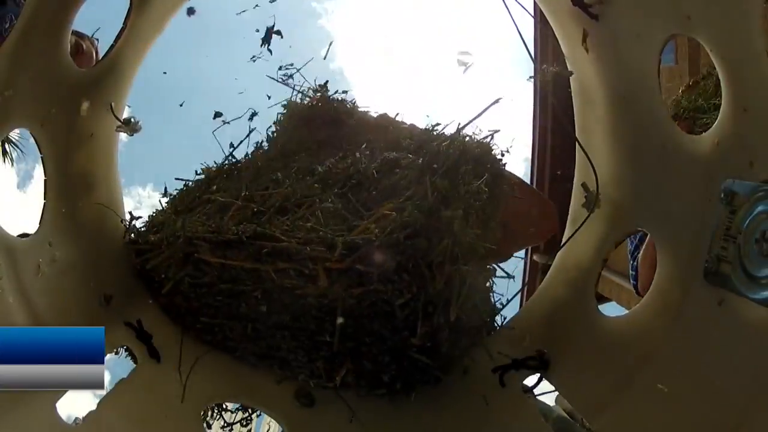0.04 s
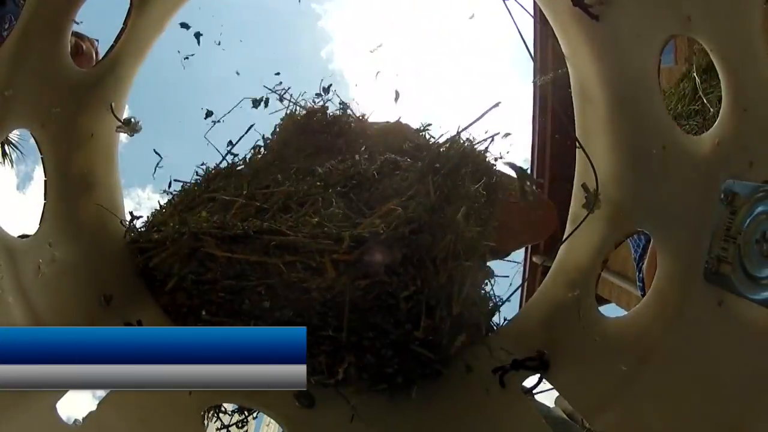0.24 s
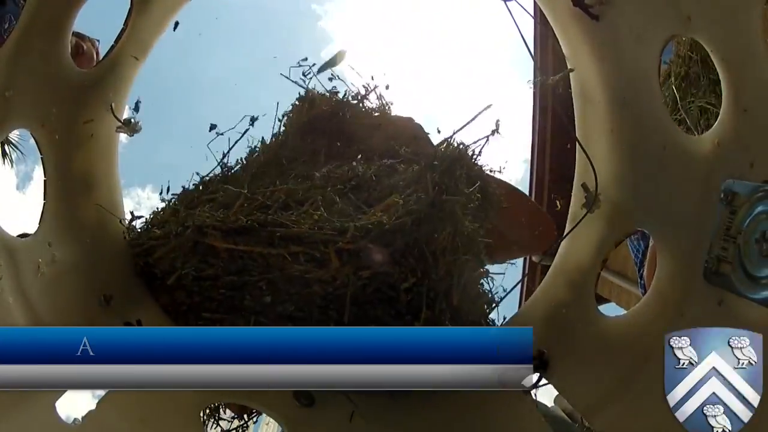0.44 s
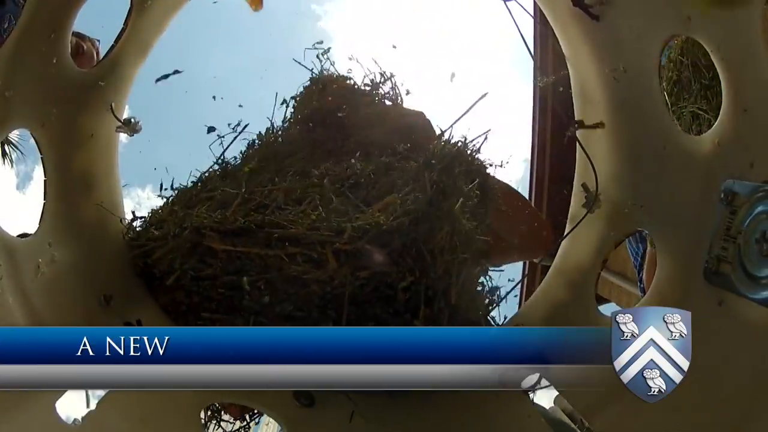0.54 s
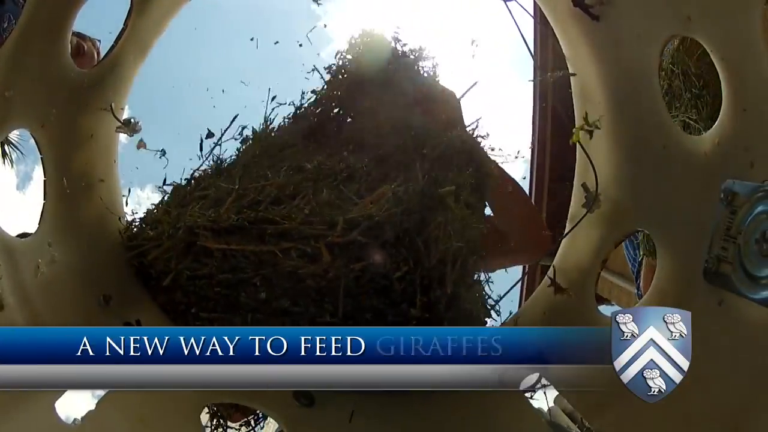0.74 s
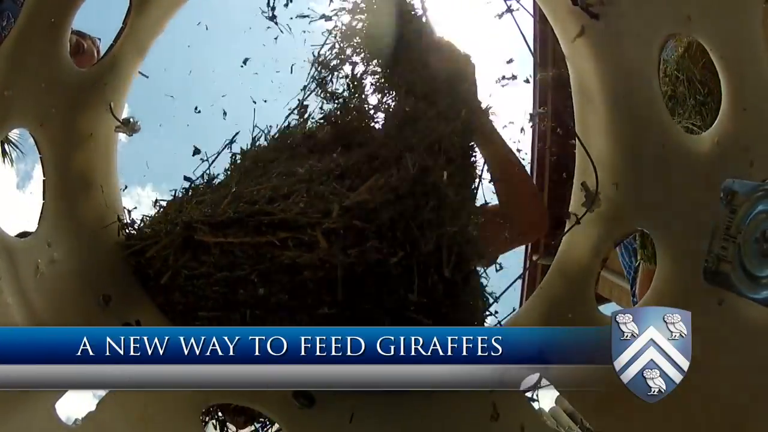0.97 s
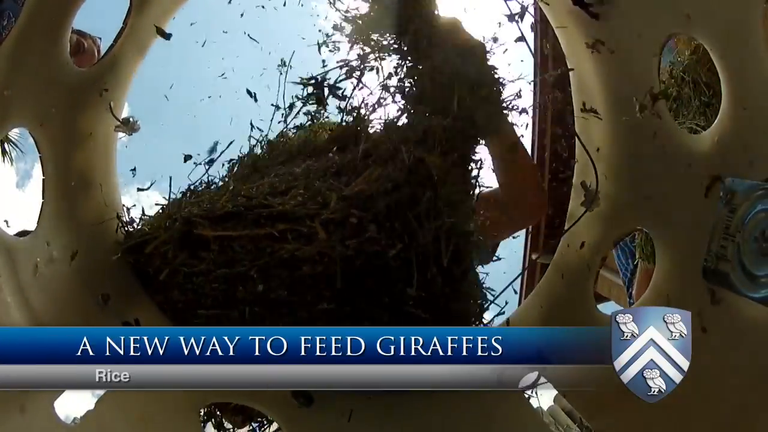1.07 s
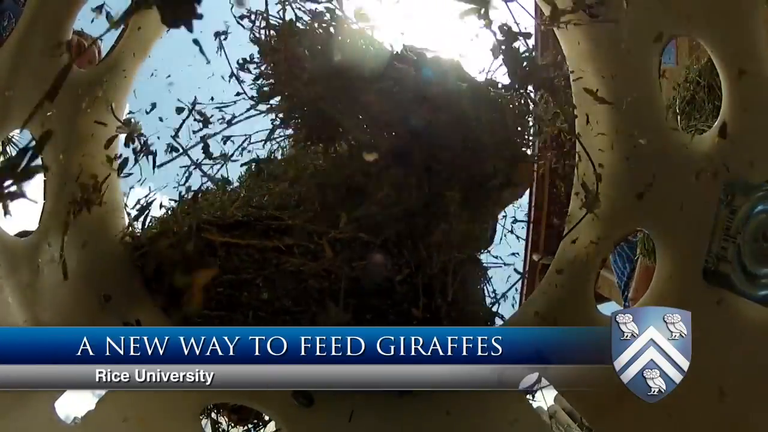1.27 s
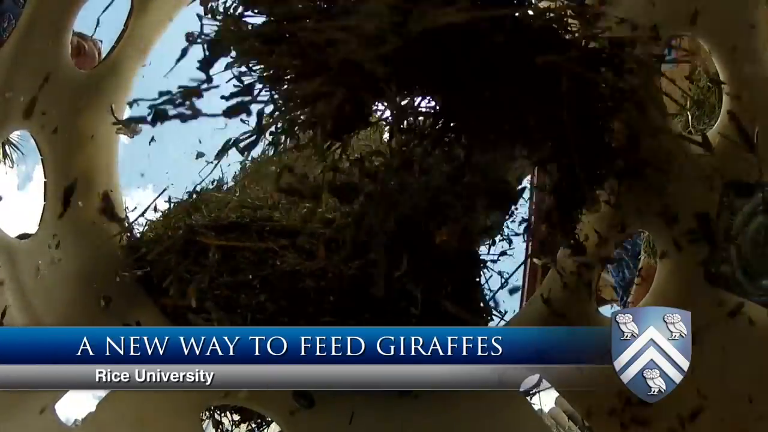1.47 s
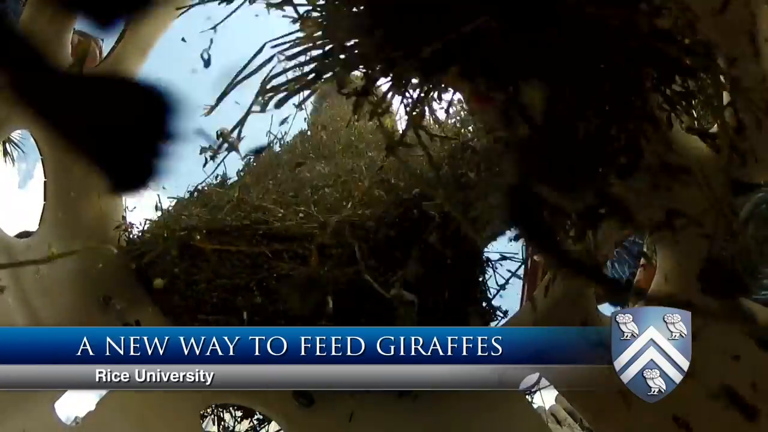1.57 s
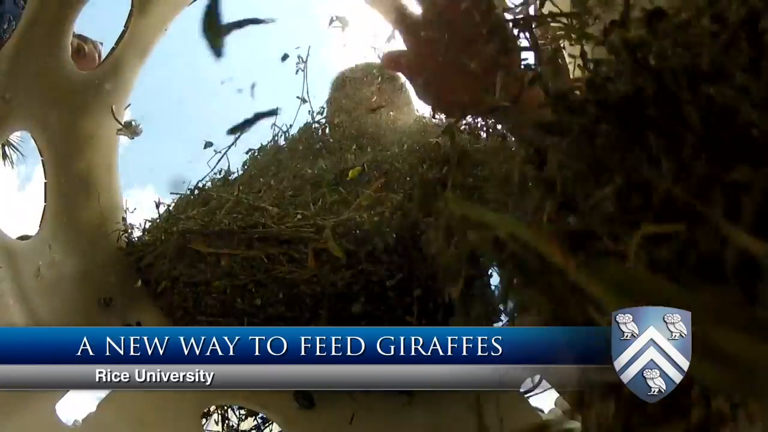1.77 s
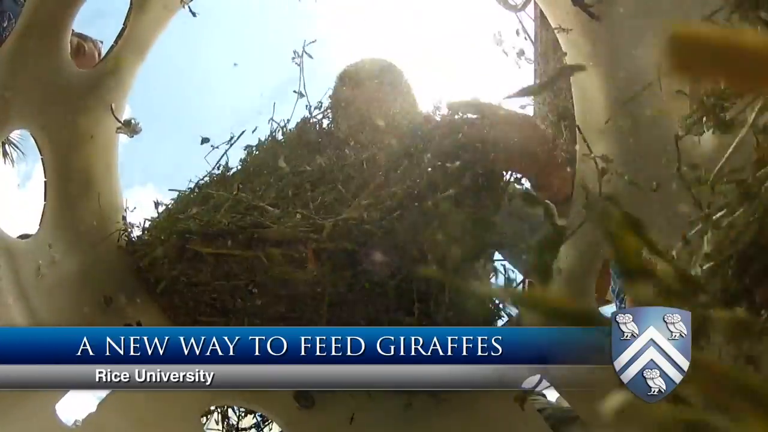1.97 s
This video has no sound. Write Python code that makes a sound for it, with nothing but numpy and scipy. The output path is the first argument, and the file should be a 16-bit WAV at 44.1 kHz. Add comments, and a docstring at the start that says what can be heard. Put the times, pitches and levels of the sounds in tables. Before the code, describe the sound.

Dry hay rustles and crackles into a plastic pipe, with one sharp knock.

```python
"""Dry hay is pushed in armfuls into a plastic pipe feeder, heard from a camera's microphone inside the pipe.
Countless stalks crackle and scrape along the wall, a few snap close by, and one flicks the camera.
The pipe takes one sharp knock; under it all, air rushes in the pipe and handling makes a low rumble.
The camera's coarse sample-and-hold mirrors everything into a gritty treble."""
import sys
import numpy as np
from scipy import signal
from scipy.fft import rfft, irfft, next_fast_len
from scipy.io import wavfile
from scipy.ndimage import map_coordinates

SR = 44100
rng = np.random.default_rng(int(sys.argv[2]) if len(sys.argv) > 2 else 0)


def generate_wav(signal):
    """Clip the signal to [-1, 1] and save it as 16-bit WAV at the path in sys.argv[1]."""
    frames = np.transpose(np.atleast_2d(signal))
    scaled = np.clip(frames, -1, 1) * 32767
    pcm = np.round(scaled).astype(np.int16)
    wavfile.write(sys.argv[1], SR, pcm)


N = 88993
BAND_HZ, HOLD_HZ, TOP_HZ = 5450, 12000, 15280  # the camera's input band, hold rate and final low-pass

# spectrum of cracking dry fibres (frequency [Hz], relative level [dB])
FIBRE_SPECTRUM = [(100, -63.5), (700, 1.5), (1000, 0.5), (1300, -6.5), (2050, 2), (2600, -2.5),
                  (3200, -2.5), (4200, -6), (5000, -9)]
# spectrum of the hollow wall, scraped or jolted (frequency [Hz], relative level [dB])
WALL_SPECTRUM = [(30, -3.5), (150, -6.5), (300, -2.5), (520, -1), (680, -3), (850, -11), (1200, -20),
                 (2500, -53.5)]


def hay():
    """Fibres crackle in clumps and slip along the wall; stalks nearer the microphone pop without echo."""
    # crackle of the moving hay (time [s], level [dB])
    crackle_levels = [(0, -28.5), (.045, -34), (.1, -36.5), (.145, -35.5), (.165, -54), (.22, -46.5),
                      (.26, -44.5), (.45, -49), (.485, -64), (.61, -61.5), (.78, -52), (1.05, -55),
                      (1.12, -42.5), (1.27, -38), (1.34, -50.5), (1.52, -48), (1.56, -64), (1.62, -66.5),
                      (1.83, -48), (1.9, -41), (2.02, -44)]
    # scrape of the hay along the wall (time [s], level [dB])
    scrape_levels = [(0, -23.5), (.045, -30.5), (.13, -32), (.19, -48), (.27, -34), (.36, -39.5),
                     (.5, -52.5), (.55, -50), (.61, -49), (.8, -43.5), (1.06, -44), (1.26, -33),
                     (1.34, -47), (1.5, -45.5), (1.6, -55.5), (1.8, -38.5), (1.94, -35.5), (2.02, -45)]
    # spectrum of a close, bright pop (frequency [Hz], relative level [dB])
    pop_spectrum = [(100, -36), (600, -21), (1100, -2), (2000, -1), (3600, 0), (4500, -3), (5200, -9)]
    clumps_db, crackle_db = 1.5 * wobble(per_s=130), curve(crackle_levels)
    effort = amp(crackle_db + clumps_db)
    crackle = colour(grains(per_s=7000, spread_db=7.5) * effort, FIBRE_SPECTRUM)
    pop_db = -4 + .15 * (crackle_db - crackle_db.max())  # pops fade when the hay only slides
    pops = colour(amp(pop_db) * grains(per_s=200, spread_db=1) * effort, pop_spectrum)
    slips = grains(per_s=1500, spread_db=5.5) * amp(curve(scrape_levels) + clumps_db)
    return pipe_echo(crackle + colour(slips, WALL_SPECTRUM)) + pops


def rubs():
    """The bundle catches on the wall and judders briefly at an unsteady pitch."""
    # catches on the wall (time [s], half length [s], pitch [Hz], level [dB])
    catches = [(.27, .008, 440, -32), (.33, 0.0056, 620, -40), (.553, 0.0076, 950, -49.5),
               (1.215, .007, 400, -41)]
    out, t = np.zeros(N), np.arange(N) / SR
    for s, half, hz, db in catches:
        swell = amp(db) * np.exp(-.5 * ((t - s) / half) ** 2)
        out += swell * np.sqrt(2) * np.sin(2 * np.pi * hz * t + 1.2 * wobble(per_s=160))
    return out


def snaps():
    """Stalks breaking close to the microphone crack, jolt the wall and ring briefly."""
    # breaking stalks (time [s], level [dB], thud re crack [dB], ring pitch [Hz], ring re crack [dB])
    breaks = [(.0035, -19.5, -18, 3380, 5.5), (.028, -20.5, -16, 2230, 9.5), (.0405, -14.5, 3.5, 2360, 5),
              (.0665, -23, 4, 1980, 8.5), (.08, -28.5, -12, 1980, 10.5), (.09, -29, -7, 2000, 15),
              (0.1397, -23, -7, 1950, -3), (0.1753, -30, -25, 2720, 7.5), (0.1952, -40.5, -20, 3854, 10),
              (1.2455, -33.5, 6, 3040, 10), (1.271, -25.5, -16, 2002, 0), (1.284, -32, -6, 2270, 0),
              (1.872, -27.5, -7, 3830, 5.5), (1.876, -27, -2, 2000, 4), (1.9225, -31, 5.5, 1910, 0),
              (1.988, -35, -14, 2850, 4)]
    cracks = bursts([(s, db) for s, db, *_ in breaks], t60_s=.012)
    thuds = bursts([(s, db + thud_db) for s, db, thud_db, *_ in breaks], t60_s=.013)
    ring_t60_s = .0094
    rings = sum(struck([(hz, db + ring_db, ring_t60_s)], s, attack_s=.00037)
                for s, db, _, hz, ring_db in breaks)
    return colour(cracks, FIBRE_SPECTRUM) + colour(thuds, WALL_SPECTRUM) + rings


def flicks():
    """A stalk flicks twice against the camera, each time a sharp click and a short fibrous rattle."""
    # rattle of each flick (time [s], level [dB])
    hits = [(1.3102, -31), (1.3208, -22)]
    # spectrum of the stalk on the camera (frequency [Hz], relative level [dB])
    flick_spectrum = [(100, -22), (600, -12), (1100, 1), (2000, 1), (3600, 2), (4500, -2.5), (5400, -5)]
    clicks = np.zeros(N)
    for s, db in hits:
        clicks[round(s * SR)] = -amp(db + 21)  # the click stands 21 dB above its rattle
    return colour(clicks + bursts(hits, t60_s=.011), flick_spectrum)


def knock():
    """A hard clack of first contact, then the damped wall thumps, and again on the rebound."""
    # the knock and its rebound (time [s], gain [dB])
    blows = [(0.6267, 1), (0.6372, -12.5)]
    # low modes of the pipe wall (frequency [Hz], level [dB], t60 [s])
    low_modes = [(380, -1.9, 0.028), (447, -4.1, .033), (520, -8.5, 0.045), (598, -0.5, .0176)]
    # high modes of the wall, rung by first contact (frequency [Hz], level [dB], t60 [s])
    high_modes = [(1130, -31.5, 0.034), (1770, -37, 0.024), (2255, -34, .025), (2726, -20, 0.012),
                  (3830, -35, 0.02)]
    # spectrum of the contact tick (frequency [Hz], relative level [dB])
    tick_spectrum = [(100, -19), (600, 5), (1100, -5), (1500, -3), (2750, -1), (4000, -10), (4600, -19),
                     (5400, -11)]
    contact_s = blows[0][0] - .0015  # just ahead of the thump
    tick = colour(bursts([(contact_s, -27.5)], t60_s=.018), tick_spectrum)
    clack = struck(high_modes, contact_s, attack_s=.0007)
    thumps = sum(amp(db) * struck(low_modes, s, attack_s=.003) for s, db in blows)
    return tick + clack - thumps


def air():
    """Steady low rush of the air in the pipe, all around the microphone."""
    # spectrum of the air in the pipe (frequency [Hz], relative level [dB])
    air_spectrum = [(15, -26), (60, -12.5), (130, -2), (240, 1), (400, -4), (550, -11.5), (750, -24),
                    (1100, -36.5), (2500, -41), (5000, -57)]
    return amp(-39.5) * unit(colour(rng.standard_normal(N), air_spectrum))


def rumble():
    """Low handling rumble of the pipe and camera."""
    # swells as the hay brushes past the camera (time [s], level [dB])
    rumble_levels = [(0, -46), (.06, -45), (.2, -40.5), (.55, -41.5), (.75, -42.5), (1.08, -43.5),
                     (1.13, -37.5), (1.18, -41.5), (1.27, -32), (1.33, -42.5), (1.48, -38.5), (1.58, -49),
                     (1.8, -39), (1.92, -40.5), (2.02, -51)]
    # spectrum of the handling noise (frequency [Hz], relative level [dB])
    rumble_spectrum = [(15, -16.5), (45, 0), (110, 0), (170, -7.5), (300, -11), (700, -41.5), (2000, -76)]
    return amp(curve(rumble_levels)) * unit(colour(rng.standard_normal(N), rumble_spectrum))


def pipe_echo(x, echo_db=-11.5, t60_s=.049):
    """Add dense, short reflections between the pipe's walls."""
    t = np.arange(SR // 8) / SR
    tail = rng.standard_normal(len(t)) * amp(-60 * t / t60_s)
    return x + amp(echo_db) * signal.fftconvolve(x, tail / np.linalg.norm(tail))[:N]


def grains(per_s, spread_db):
    """Random tiny impulses of uneven size, rms 1."""
    chance, size, side = rng.random(N), rng.standard_normal(N), rng.standard_normal(N)
    return unit((chance < per_s / SR) * amp(spread_db * np.minimum(size, 2)) * np.sign(side))


def bursts(rows, t60_s):
    """For each (time [s], level [dB]), a quickly dying volley of tiny cracks."""
    out, t = np.zeros(N + SR), np.arange(SR // 20) / SR
    for s, db in rows:
        out[round(s * SR):][:len(t)] += amp(db - 60 * t / t60_s) * np.sign(rng.standard_normal(len(t)))
    return out[:N]


def struck(modes, start_s, attack_s):
    """Damped modes (frequency [Hz], level [dB], t60 [s]) set ringing at start_s."""
    t = np.maximum(np.arange(N) / SR - start_s, 0)
    ringing = sum(amp(db - 60 * t / t60) * np.sin(2 * np.pi * hz * t) for hz, db, t60 in modes)
    return ringing * (1 - np.exp(-t / attack_s))


def colour(x, spectrum):
    """Causal filter shaped like the spectrum, with unit energy below BAND_HZ."""
    size = 8192
    bins_hz = np.fft.rfftfreq(size, 1 / SR)
    hz, db = np.transpose(spectrum)
    gain = amp(np.interp(np.log(bins_hz + 1), np.log(hz), db))
    gain /= np.sqrt(np.mean((gain * (bins_hz < BAND_HZ)) ** 2))
    cepstrum = irfft(np.log(gain))
    cepstrum[1:size // 2] *= 2  # fold to minimum phase, so nothing sounds ahead of a crack
    cepstrum[size // 2 + 1:] = 0
    return signal.fftconvolve(x, irfft(np.exp(rfft(cepstrum))))[:N]


def wobble(per_s):
    """A smooth random curve with per_s knots a second."""
    knots = rng.standard_normal(int(N * per_s / SR) + 4)
    return map_coordinates(knots, [np.arange(N) * per_s / SR])


def curve(rows):
    """One level per sample from (time [s], level [dB]) rows."""
    return np.interp(np.arange(N) / SR, *np.transpose(rows))


def amp(db):
    """Decibels to gain."""
    return 10 ** (np.asarray(db) / 20)


def unit(x):
    """Scale to rms 1."""
    return x / np.sqrt(np.mean(x ** 2) + 1e-20)


def scene():
    """Everything reaches one microphone inside the pipe, at close range."""
    return (hay() + rubs() + snaps() + flicks() + knock() + air() + rumble())[None]


def record(dry):
    """The camera samples and holds a narrow band, mirroring it around the hold rate, then cuts the top."""
    size = next_fast_len(N + SR // 2)
    hz = np.fft.rfftfreq(size, 1 / SR)
    narrow = irfft(rfft(dry, size) / np.sqrt(1 + (hz / BAND_HZ) ** 36), size)
    mirrored = narrow * (1 + 2 * np.cos(2 * np.pi * HOLD_HZ * np.arange(size) / SR))
    hold_droop = np.sinc(hz / HOLD_HZ) + .003j  # a slight leak keeps the notch at HOLD_HZ finite
    low_pass = 1 / np.sqrt(1 + (hz / TOP_HZ) ** 320)
    return irfft(rfft(mirrored) * hold_droop * low_pass, size)[:, :N]


dry = scene()
out = record(dry)
generate_wav(out)
```